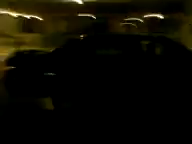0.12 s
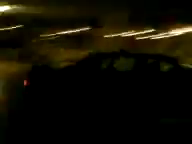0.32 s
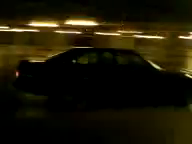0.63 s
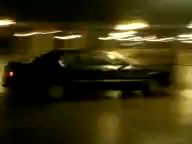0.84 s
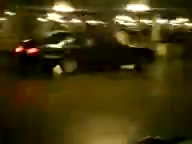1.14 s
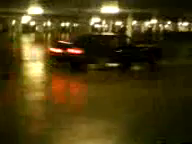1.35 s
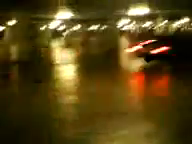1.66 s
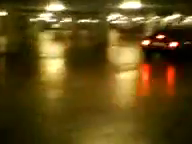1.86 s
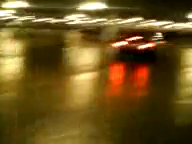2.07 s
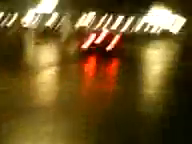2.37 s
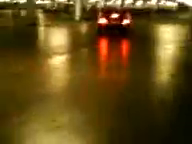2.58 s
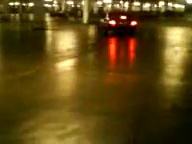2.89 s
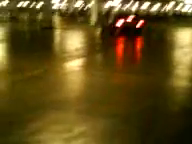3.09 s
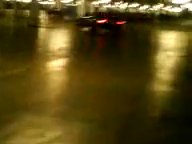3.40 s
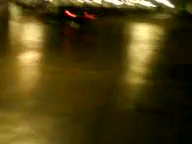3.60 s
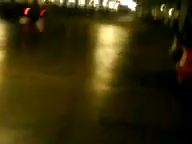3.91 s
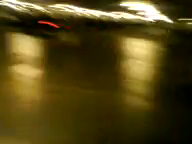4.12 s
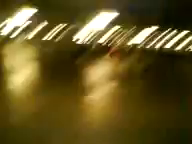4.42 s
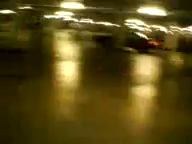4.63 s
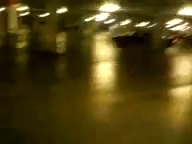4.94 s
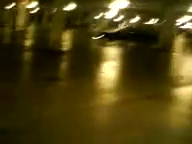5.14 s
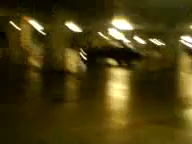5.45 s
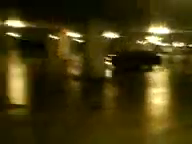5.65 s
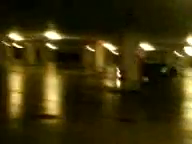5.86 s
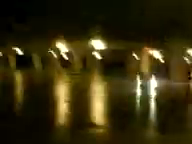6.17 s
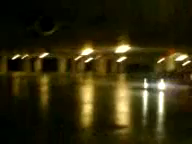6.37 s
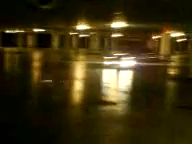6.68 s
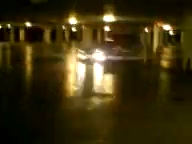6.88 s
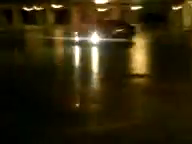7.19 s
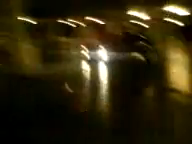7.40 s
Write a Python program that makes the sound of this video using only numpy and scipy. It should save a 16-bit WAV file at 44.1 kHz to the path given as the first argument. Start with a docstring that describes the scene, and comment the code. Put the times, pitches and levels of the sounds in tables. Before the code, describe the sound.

A car spins its wheels close by in a concrete parking garage, tyres squealing over a booming exhaust. The revs drop, and shorter squeals and chirps follow as it moves off and idles in the distance. After a small tick and a faint high ringing, the engine revs up and the car comes back in a long, loud, screeching slide. The hall echoes, and the sound is narrow like a telephone, distorting at its loudest.

```python
"""Tyres squeal over a booming engine as a car spins its wheels close by in a concrete parking garage.
It eases off, squeals through a turn, idles far away, then revs up and comes back sliding. Each firing
booms in the exhaust pipe; the rubber sticks and slips on the smooth floor, so it sings, chirps and scrubs.
Midway come a sharp tick and a faint, thin, high ringing. The hall echoes, and a narrow-band recorder
clips the loudest moments."""
import sys
import numpy as np
from scipy import signal
from scipy.fft import rfft, irfft, next_fast_len
from scipy.io import wavfile

SR = 44100
rng = np.random.default_rng(int(sys.argv[2]) if len(sys.argv) > 2 else 0)


def output_pcm(signal):
    """Save a mono or channel-first signal as 16-bit PCM at the path in sys.argv[1].

    Samples are clipped to [-1, 1] before scaling.
    """
    pcm = np.clip(np.atleast_2d(signal).T, -1, 1) * 32767
    wavfile.write(sys.argv[1], SR, np.round(pcm).astype(np.int16))


N = 334719
TIME = np.arange(N) / SR

# engine speed in turns of the crankshaft a second: t/s, f/Hz
ENGINE_SPEED = [(0.1, 58.14), (0.5, 62.55), (0.66, 62.25), (0.9, 43.5), (1.12, 31.75), (1.45, 30.37),
                (1.65, 26.66), (2.3, 25.68), (2.7, 23.17), (4.21, 22.7), (4.25, 36.64), (4.45, 47.5),
                (4.66, 50.47), (4.9, 58.9), (5.27, 66.6), (5.66, 81.67), (6.25, 97.44), (6.92, 104.4),
                (7.35, 111.8), (7.59, 108.7)]
# loudness of the exhaust, set by throttle and distance: t/s, level/dB
EXHAUST_LEVEL = [(0, -23), (0.6, -17.5), (0.9, -18), (1.02, -36), (1.16, -24.5), (1.25, -53.5),
                 (1.65, -59.5), (1.95, -42), (2.55, -43.5), (2.85, -39), (3.5, -44), (4.22, -40.5),
                 (4.28, -28), (4.38, -24.5), (4.62, -29.5), (5.03, -27), (5.24, -22.5), (5.45, -23.5),
                 (5.76, -24), (5.9, -27), (6.48, -21), (6.6, -37), (7.28, -21.5), (7.59, -35)]
# strong engine tones, the first being the firings: multiple of engine speed, idle/dB, full revs/dB
STRONG_TONES = [(2, 0, -2.5), (3, -14.5, -7.5), (4, 0, -10), (6, -5, -14.5)]
# weak engine tones before the silencer: multiple of engine speed, level/dB against all the strong ones
WEAK_TONES = [(1, -8), (1.5, -29.5), (2.5, -31), (3.5, -17.5), (4.5, -22.5), (5, -8), (7, -19), (8, -13),
              (9, -13), (10, -12.5), (11, -26)]
# how the pipe boosts the strong tones and the silencer passes the weak ones: f/Hz, gain/dB
PIPE_GAIN = [(45, -28.5), (70, -5), (90, 1), (104, 1.5), (130, 3.5), (165, 1.5), (195, -10), (225, 0),
             (258, 6.5), (300, 3), (335, -2), (370, -1.5), (440, -10), (650, -12.5)]
SILENCER_GAIN = [(20, -50), (60, -24.5), (85, -4.5), (150, 4.5), (215, -1), (300, -3.5), (420, -12),
                 (500, -8), (600, -19), (900, -15)]
# squeals, and at 4.023 s a faint, thin, high ringing near 3.3 kHz:
# t/s, length/s, first f/Hz, middle f/Hz, last f/Hz, middle level/dB, swell/dB,
# upper note as a multiple of the pitch, upper note/dB, roughness as a share of the pitch, stutter/dB
HELD_NOTES = [(0, 0.84, 1290, 1301, 1350, -24, 12, 2, -9, 0.06, 1),
              (0.855, 0.28, 1320, 1315, 1275, -16.5, 0.5, 1.93, -9, 0.024, 5),
              (1.12, 0.3, 1280, 1216, 1343, -28, 1, 1.97, -2, 0.028, 5),
              (1.669, 0.3, 1458, 1300, 1279, -28, -3, 2.16, -4.5, 0.019, 3),
              (2.012, 0.075, 1302, 1330, 1345, -32, 4, 2.13, -6.5, 0.019, 3.5),
              (2.123, 0.14, 1335, 1339, 1362, -30, 8, 2.12, -6, 0.015, 1.5),
              (2.298, 0.125, 1400, 1514, 1580, -46, 8, 2.11, 4, 0.016, 4.5),
              (3.77, 0.41, 2064, 2113, 2074, -43.5, -18.5, 2, -35, 0.013, 4),
              (4.023, 1.04, 3310, 3300, 3400, -52, -2, 2, -45, 0.028, 5.5),
              (5.54, 0.51, 1803, 1841, 1826, -29, 17.5, 2, -21.5, 0.0429, 4.5),
              (6.16, 1.45, 1861, 1790, 1697, -16, 6, 2, -18.5, 0.048, 0.5),
              (5.98, 1.09, 1389, 1400, 1510, -19.5, 7, 2, -19.5, 0.057, 4.5),
              (7.12, 0.48, 1532, 1517, 1493, -11, -1, 2, -22, 0.035, 3)]
# tread grabbing the floor: t/s, length/s, f/Hz, level/dB, pitch scatter/Hz
CHIRPS = [(0.748, 0.053, 2406, -20.5, 253), (0.859, 0.05, 1364, -7.5, 35), (0.921, 0.1, 1325, -8.5, 48),
          (1.024, 0.014, 1280, -13, 37.6), (1.056, 0.037, 1253, -11.5, 36), (1.058, 0.035, 2495, -17, 53),
          (1.237, 0.018, 1198, -23.5, 17), (1.283, 0.013, 2454, -10.5, 26), (1.287, 0.021, 1239, -15.5, 25),
          (1.378, 0.027, 1380, -22.5, 66), (1.469, 0.092, 2710, -35.5, 71),
          (1.632, 0.0086, 1467, -37.5, 9.1), (1.698, 0.023, 3033, -20.5, 48),
          (2.703, 0.016, 2580, -41.5, 255), (2.717, 0.025, 3056, -26.5, 115),
          (2.72, 0.05, 2240, -24.5, 138), (2.77, 0.023, 2052, -23, 145), (3.735, 0.063, 2045, -21.5, 26),
          (4.206, 0.015, 2332, -49, 100), (4.292, 0.014, 2350, -37.5, 150), (4.366, 0.03, 2400, -40.5, 130),
          (5.713, 0.014, 2359, -20.5, 140), (5.784, 0.015, 1924, -21, 56), (5.807, 0.023, 1830, -13, 33.6),
          (5.889, 0.012, 2251, -14.5, 82), (5.959, 0.021, 1870, -21, 71), (5.982, 0.029, 1781, -12, 84),
          (6.039, 0.0069, 1830, -13.5, 46.5), (6.055, 0.017, 2290, -14, 140),
          (6.112, 0.031, 1830, -11.5, 65), (6.149, 0.025, 2590, -16.5, 124),
          (6.251, 0.017, 1569, -14.5, 98), (7.189, 0.025, 1512, -8, 58), (7.348, 0.029, 1601, -10, 74)]
# how gas rumble, road roar and tread scrub rise and fall: t/s, level/dB
RUMBLE_LEVEL = [(0, -18), (0.45, -20), (0.8, -20), (1.05, -22.5), (1.17, -39.5), (1.56, -42.5), (1.85, -39),
                (2.62, -43.5), (2.78, -33), (3.1, -42), (4.22, -39), (4.26, -23.5), (4.42, -24.5),
                (4.75, -37), (5.3, -35.5), (5.5, -24), (6.3, -27), (7.59, -20.5)]
ROAR_LEVEL = [(0.0, -19.5), (0.7, -23), (0.78, -32), (0.95, -32), (1.58, -60.5), (1.94, -50.5),
              (2.37, -62.5), (2.75, -52), (3.28, -70.5), (3.63, -56), (4.14, -66), (4.29, -43),
              (4.52, -48.5), (6.85, -28.5), (7.44, -29.5), (7.59, -40)]
SCRUB_LEVEL = [(0, -18), (0.77, -19), (1.15, -35), (1.55, -49), (1.85, -43.5), (2.62, -60.5), (2.78, -37.5),
               (2.9, -60), (3.7, -56), (4.2, -55.5), (4.7, -47), (5, -40.5), (5.6, -36), (6.2, -25),
               (6.62, -15.5), (7.42, -16), (7.59, -25)]
# tone colours of slow gas, fast gas, road, sliding tread, gritty grabs and hiss: f/Hz, level/dB
RUMBLE_COLOUR = [(25, -29), (50, -12), (85, -0.5), (140, -3.5), (220, -6.5), (300, -14.5), (420, -21),
                 (520, -27), (900, -49)]
BLARE_COLOUR = [(120, -18.5), (200, -9.5), (270, -3), (380, -10.5), (500, -12.5), (800, -30.5)]
ROAR_COLOUR = [(200, -3.5), (400, 2), (600, 1), (850, 1.5), (1100, -4), (1500, -18.5), (2200, -12)]
SCRUB_COLOUR = [(700, -26.5), (1100, -3.5), (1330, -0.5), (1700, -2), (2050, -2.5), (2400, 1.5), (2900, -4),
                (3350, -4.5), (4200, -5.5)]
GRIT_COLOUR = [(150, -18.5), (400, -7.5), (1000, -19), (1500, -8), (1900, 6), (2400, 5), (2900, -0.5),
               (3400, -0.5), (4200, -9.5)]
HISS_COLOUR = [(1200, -20), (2300, 4.5), (3000, -1.5), (3400, 4), (4200, 6.5)]
# the notes a tick rings with: f/Hz, level/dB, decay/s
TICK_NOTES = [(1100, -22, 0.00041), (1920, -3, 0.00091), (2700, 3.5, 0.00054), (3180, 2.5, 0.0015)]

IDLE_HZ, FULL_REVS_HZ = 23, 110
PASS_S, PASS_LENGTH_S, PASS_DB_PER_OCTAVE, PASS_PIVOT_HZ = 0.33, 0.41, 15.5, 228
NOTE_ATTACK_S, NOTE_RELEASE_S = 0.01, 0.026
BEND_HZ, RASP_HZ, STUTTER_HZ = 55.44, 448, 89.9  # how fast a held note wobbles
HALL_BASS_S, HALL_TREBLE_S = 1.19, 0.83  # time for the echoes to fade by 60 dB


def exhaust_boom(crank_hz, crank_angle):
    """Tones follow the engine speed and swell where the pipe resonates; uneven firings shake them."""
    exhaust_db = curve(EXHAUST_LEVEL)
    revs = (crank_hz - IDLE_HZ) / (FULL_REVS_HZ - IDLE_HZ)
    nearness = 1 / (1 + ((TIME - PASS_S) / PASS_LENGTH_S) ** 6)
    tones = []
    for multiple, idle_db, full_db in STRONG_TONES:
        hz = multiple * crank_hz
        revs_db = idle_db + revs * (full_db - idle_db)
        pipe_db = np.interp(hz, *np.transpose(PIPE_GAIN))
        # brighter while the tailpipe passes close by
        bright_db = nearness * PASS_DB_PER_OCTAVE * np.log2(hz / PASS_PIVOT_HZ)
        tones.append((multiple, exhaust_db + revs_db + pipe_db + bright_db + 2.1 * wobble(9.5)))
    strong_db = 10 * np.log10(sum(undb(db) ** 2 for _, db in tones))
    weak_db = strong_db - 4.5 - revs  # 1 dB further down at full revs
    for multiple, db in WEAK_TONES:
        silencer_db = np.interp(multiple * crank_hz, *np.transpose(SILENCER_GAIN))
        tones.append((multiple, weak_db + db + silencer_db + 3 * wobble(17)))
    boom = np.zeros(N)
    for multiple, db in tones:
        uneven_db = 1.9 * wobble(60)
        boom += undb(db + uneven_db) * np.sin(multiple * crank_angle + rng.uniform(0, 2 * np.pi))
    return np.sqrt(2) * undb(-0.5) * boom


def squeals_and_ringing():
    """Pairs of shaky notes bend in one arc: squeals from uneven grip, and one faint, high ringing."""
    out = np.zeros(N + 2 * SR)
    for t, length, first_hz, mid_hz, last_hz, db, swell_db, ratio, upper_db, rough, dip_db in HELD_NOTES:
        start, size = int(t * SR), int(length * SR)
        age = TIME[:size]
        progress = age / length
        arc_hz = np.polyval(np.polyfit([0, .5, 1], [first_hz, mid_hz, last_hz], 2), progress)
        fade = np.clip(np.minimum(age / NOTE_ATTACK_S, (length - age) / NOTE_RELEASE_S), 0, 1)
        swell = fade * undb(swell_db * (progress - .5))
        for hz, note_db in (arc_hz, db), (ratio * arc_hz, db + upper_db):
            bend, rasp, shake = (wobble(rate, 2 * SR)[:size] for rate in (BEND_HZ, RASP_HZ, STUTTER_HZ))
            note = note_with_octave(hz * (1 + rough * (0.7 * bend + rasp)), overtone_db=-22)
            stutter = unit(undb(dip_db * shake))
            out[start:start + size] += undb(note_db) * swell * stutter * note
    return out[:N]


def tyre_chirps():
    """The tread grabs the floor and snaps back; the more its pitch scatters, the grittier it sounds."""
    out = np.zeros(N + SR)
    grit = colour(rng.standard_normal(N) * undb(4 * wobble(600)), GRIT_COLOUR)
    for t, length, hz, db, scatter_hz in CHIRPS + slide_grabs():
        start, size = int((t - .002) * SR), int((length + 0.0066) * SR)
        bend, shake = (wobble(rate, SR // 4)[:size] for rate in (400, 220))
        grit_share = np.clip((scatter_hz / 185) ** 3, 0, .8)
        note = note_with_octave(hz + 1.05 * scatter_hz * bend, overtone_db=-39)
        grab = np.sqrt(1 - grit_share) * note + np.sqrt(grit_share) * grit[start:start + size]
        swell = np.sin(np.pi * (np.arange(size) / size) ** 0.55) ** 0.58  # builds fast, lets go slowly
        flutter = undb(-2 * np.sqrt(grit_share) * shake)
        out[start:start + size] += undb(db - 1) * unit(swell * flutter * grab)
    return out[:N]


def slide_grabs(count=14, from_s=6.5, to_s=7.55, length_s=0.029, scatter_hz=88, high_share=0.35):
    """In the long slide the tread also grabs by chance, high or low: more rows like those of CHIRPS."""
    rows = []
    for i, (when, kind, detune) in enumerate(rng.random((count, 3))):
        t = from_s + (to_s - from_s) * (i + when) / count
        hz, db = (2405, -12.5) if kind < high_share else (1543, -11.5)
        rows.append((t, length_s, hz * (1 + 0.103 * (detune - .5)), db, scatter_hz))
    return rows


def gas_rumble(throb, crank_hz):
    """Gas puffs out with each firing; faster gas turns the rumble into a brighter blare."""
    puffs = rng.standard_normal(N) * (1 + 0.67 * throb)
    flow = np.clip(crank_hz / 48, 0, 1) ** 2
    rumble = colour(puffs, RUMBLE_COLOUR) * undb(-6 - 6.4 * flow)
    blare = colour(puffs, BLARE_COLOUR) * flow * undb(-13)
    return (rumble + blare) * undb(curve(RUMBLE_LEVEL) + 3.1 * wobble(14))


def road_roar(throb):
    """The road roars under the car, pulsing a little with the firings."""
    roar = colour(rng.standard_normal(N) * (1 + 0.34 * throb), ROAR_COLOUR)
    return roar * undb(curve(ROAR_LEVEL) + 1.36 + 1.9 * wobble(25))


def tread_scrub():
    """Sliding tread makes countless small slips, and patches of it ring for a moment each."""
    slips = rng.standard_normal(N) * undb(1.7 * wobble(160))
    patches = np.zeros(N)
    for hz in np.geomspace(1350, 3200, num=7):
        strength = undb(5 * wobble(45))
        shaky_hz = hz * (1 + .06 * wobble(60) + .03 * wobble(500))
        patches += strength * np.sin(2 * np.pi * np.cumsum(shaky_hz) / SR)
    scrub = colour(unit(slips) + undb(-8.5) * unit(patches), SCRUB_COLOUR)
    return scrub * undb(curve(SCRUB_LEVEL) + 3)


def tick(at_s=3.8165, gain_db=-17):
    """A small hard click close by that rings for a millisecond or so."""
    age = np.maximum(TIME - at_s, 0)
    return sum(undb(gain_db + db) * np.exp(-age / decay) * np.sin(2 * np.pi * hz * age)
               for hz, db, decay in TICK_NOTES)


def hall_echoes(sound, split_hz=700, build_s=0.018):
    """Sound bounces between floor, ceiling and pillars; the treble dies first."""
    age = TIME[:2 * SR]
    noise = rng.standard_normal(len(age))
    bass = signal.sosfilt(signal.butter(2, split_hz, fs=SR, output="sos"), noise)
    tail = bass * undb(-60 * age / HALL_BASS_S) + (noise - bass) * undb(-60 * age / HALL_TREBLE_S)
    tail *= np.minimum(age / build_s, 1)
    return signal.fftconvolve(sound, tail / np.sqrt(np.sum(tail ** 2)))[:N]


def hiss():
    """A faint, steady hiss behind everything."""
    return undb(-68) * colour(rng.standard_normal(N), HISS_COLOUR)


def note_with_octave(hz, overtone_db):
    """A pure note with a faint octave above it."""
    phase = 2 * np.pi * np.cumsum(hz) / SR
    return np.sqrt(2) * (np.sin(phase) + undb(overtone_db) * np.sin(2 * phase))


def undb(db):
    """Turn decibels into a factor to multiply by."""
    return 10 ** (np.asarray(db) / 20)


def unit(x):
    """Scale a signal to an average power of 1."""
    return x / np.sqrt(np.mean(x ** 2) + 1e-18)


def curve(table):
    """Join (t/s, value) points with straight lines, one value per sample."""
    return np.interp(TIME, *np.transpose(table))


def wobble(rate, size=N):
    """A smooth random wobble, about 1 in size, that takes a new value `rate` times a second."""
    position = np.arange(size) * rate / SR
    values = rng.standard_normal(size // 20 + 3)
    step = position.astype(int)
    blend = np.sin(np.pi / 2 * (position % 1)) ** 2
    return (values[step] * (1 - blend) + values[step + 1] * blend) / np.sqrt(3 / 4)


def colour(sound, points):
    """Shape a sound's lows and highs by (f/Hz, level/dB) points, at an average power of 1."""
    hz, db = np.transpose(points)
    size = next_fast_len(N)
    all_hz = np.arange(size // 2 + 1) * SR / size + 1
    gain = undb(np.interp(np.log(all_hz), np.log(hz), db, left=-70, right=-70))
    return unit(irfft(rfft(sound, size) * gain, size)[:N])


def scene():
    """Mix everything into one channel; the boom, held notes and chirps echo in the hall."""
    crank_hz = curve(ENGINE_SPEED)
    crank_angle = 2 * np.pi * np.cumsum(crank_hz * (1 + 0.005 * wobble(70))) / SR
    throb = np.cos(2 * crank_angle)  # two firings per turn
    boom = exhaust_boom(crank_hz, crank_angle)
    held_notes = squeals_and_ringing()
    chirps = tyre_chirps()
    echoes = hall_echoes(undb(-11) * boom + undb(-11.5) * held_notes + undb(-17.5) * chirps)
    noises = gas_rumble(throb, crank_hz) + road_roar(throb) + tread_scrub() + hiss()
    return (boom + held_notes + chirps + noises + tick() + echoes)[None]


def record(dry):
    """Cut the treble as a telephone does; the loudest peaks then clip flat and spit new treble."""
    narrow = signal.sosfilt(signal.butter(10, 3247, fs=SR, output="sos"), dry)
    narrow = signal.sosfilt(signal.ellip(8, .2, 80, 4200, fs=SR, output="sos"), narrow)
    clipped = np.clip(narrow, -0.74, 0.74)
    return signal.sosfilt(signal.ellip(8, .2, 70, 15900, fs=SR, output="sos"), clipped)


dry = scene()
out = record(dry)
output_pcm(out)
```